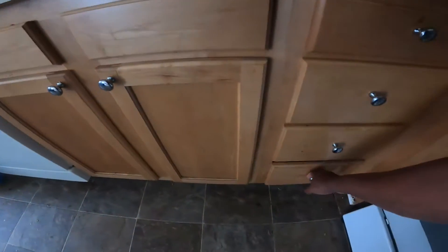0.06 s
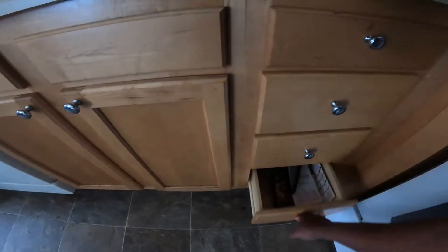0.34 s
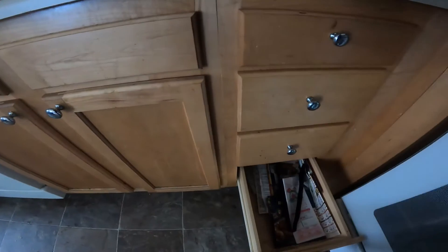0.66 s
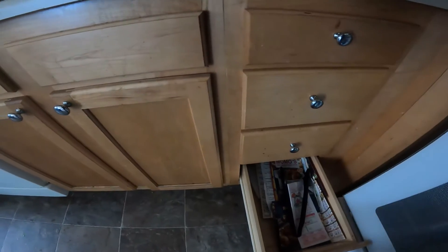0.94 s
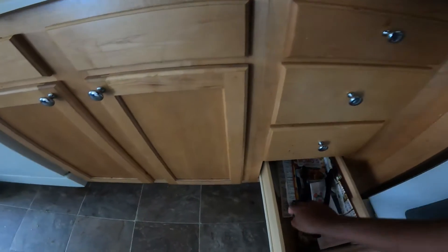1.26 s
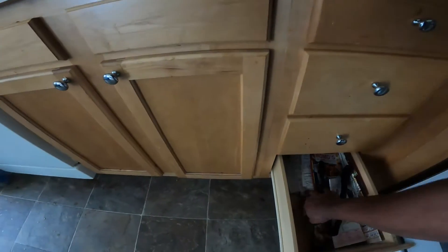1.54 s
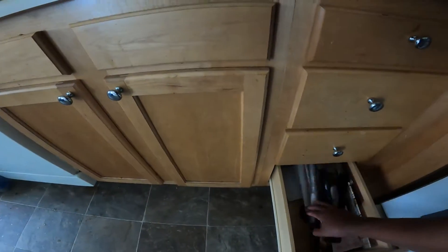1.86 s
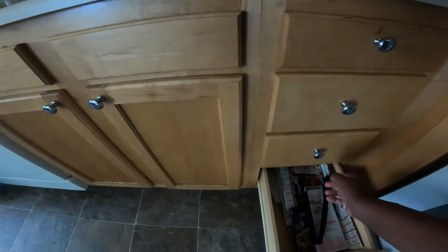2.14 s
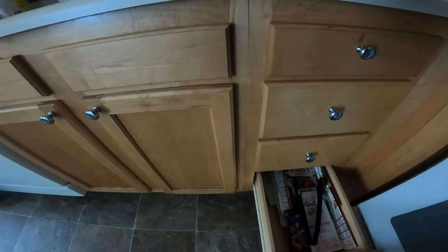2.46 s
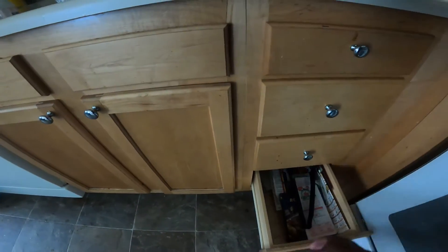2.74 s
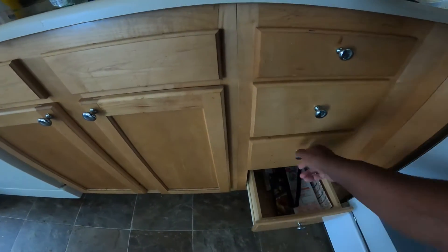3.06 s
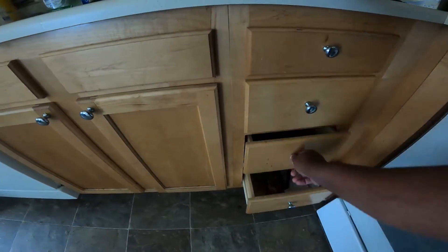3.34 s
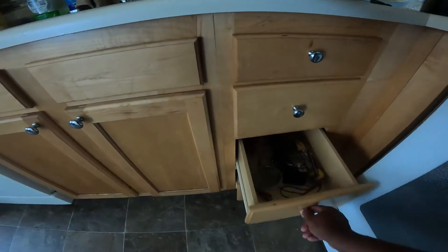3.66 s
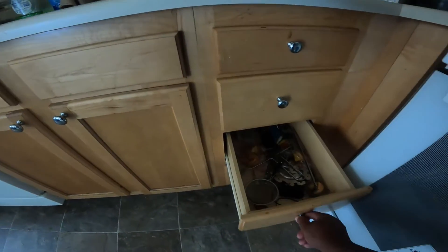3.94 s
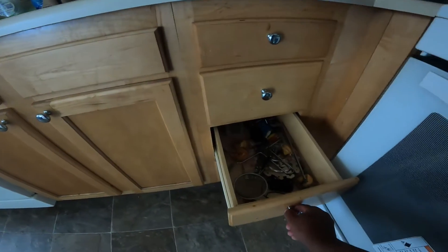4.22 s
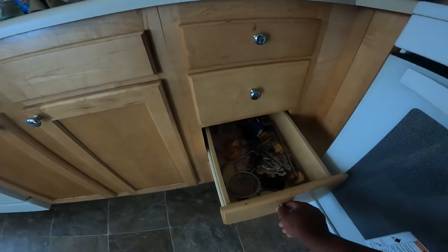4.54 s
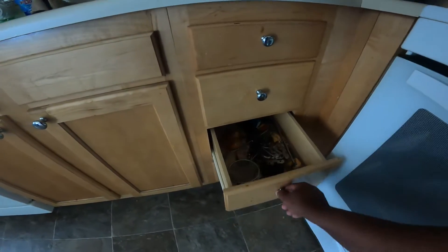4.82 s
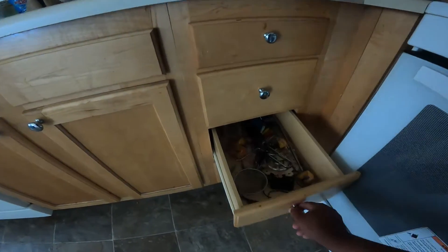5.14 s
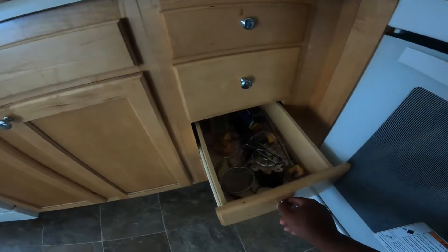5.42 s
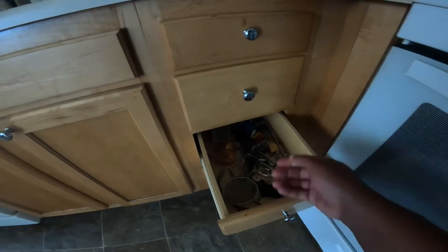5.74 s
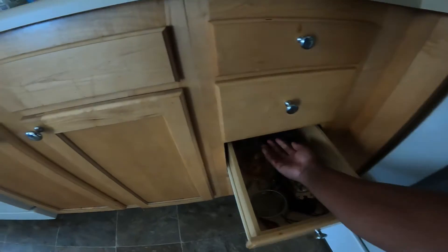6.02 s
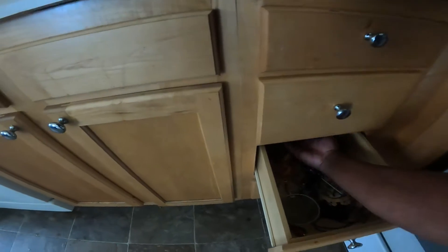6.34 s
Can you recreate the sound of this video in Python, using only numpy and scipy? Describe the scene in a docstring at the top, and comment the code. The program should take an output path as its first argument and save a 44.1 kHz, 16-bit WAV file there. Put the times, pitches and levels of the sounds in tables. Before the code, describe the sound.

Heard from just above in a small kitchen with a faint low hush, a wooden drawer scrapes open on droning rollers from about 0.3 to 1 second, with a sharp utensil clack midway. From 1.5 to 2.1 seconds a hand rummages inside: utensils shuffle, clack and ping, with a loud hollow double knock at 1.8. The drawer is pushed back in two quieter slides between 2.6 and 3.4 seconds, starting with a bump. Straight away a fuller drawer judders out, its contents clinking, and strikes its stop at 3.9 and 4.1 seconds with sharp cracks and a low cabinet thud. From about 4.7 to 5.4 seconds it is jiggled, wood rasping and knocking while the contents rattle brightly, with another hard hit at 5.2. A lighter clack follows at 5.6, then a very faint arm rustle and a small knock at 6.3 seconds.

```python
"""A wooden drawer scrapes open on droning rollers, heard from just above in a small kitchen.
A hand rummages among its utensils and pushes it back; the drawer above is pulled to its stop
and jiggled. Sliding friction of wood on wood makes the scrape. Impacts excite damped modes:
the boxes boom and ring, the cabinet thuds, runners tick, and the utensils clack and ping inside."""
import sys
import numpy as np
from scipy import signal
from scipy.fft import rfft, irfft
from scipy.io import wavfile

SR = 44100
rng = np.random.default_rng(int(sys.argv[2]) if len(sys.argv) > 2 else 0)


def transcribe(signal):
    """Save signal, clipped to [-1, 1], as a 16-bit WAV file at the path in sys.argv[1]."""
    frames = np.atleast_2d(signal).T
    limited = np.clip(frames, -1, 1)
    pcm = np.round(limited * 32767).astype(np.int16)
    wavfile.write(sys.argv[1], SR, pcm)


N = 281358
TIME = np.arange(N) / SR

# Panel resonances that colour rubs and cracks. Each row: centre in Hz, width in Hz, gain in dB.
PANELS = [(316, 42, 2.5), (452, 45, 2.5), (576, 65, 5.5), (670, 60, 3.5), (840.5, 13.4, 6), (1060, 340, -4),
          (1320, 97, 2), (2430, 23, -0.5)]
# Strokes of the bottom drawer. Each row: start, rise, hold and fall in seconds, level in dB
# relative to a firm stroke, brightness in dB.
BOTTOM_SLIDES = [(0.255, 0.29, 0.042, 0.41, 2.5, 8), (2.566, 0.22, 0.2, 0.151, -8, 10),
                 (3.024, 0.0507, 0.32, 0.063, -12.5, 3.5)]
# The upper drawer hits its stop, rebounds and shakes its contents. Each row: start in seconds,
# boom and crack in dB, rebound delay in seconds, shake level and shake brightness in dB.
STOPS = [(3.9119, -19.5, -16.5, 0.043, -8.5, 2.5), (4.094, -24, -20, .016, -4.5, 0.5),
         (5.244, -25.5, -16.5, .013, -3, -1.5)]


def from_db(db):
    return 10 ** (np.asarray(db) / 20)


def rms_one(x):
    return x / np.sqrt(np.mean(x ** 2) + 1e-20)


def unit_hit(x, size):
    """Normalisation of a hit to rms 1 over its first samples."""
    return x / np.sqrt(np.mean(x[:size] ** 2))


def at_hz(points, hz):
    """Interpolation on a logarithmic frequency axis."""
    frequencies, values = np.array(points).T
    return np.interp(np.log(hz + 1), np.log(frequencies), values)


def fade(t, t60):
    """Exponential decay, 60 dB down after t60 seconds."""
    return np.exp(-np.log(1000) * t / max(t60, 1e-3))


def band(x, hz, kind):
    return signal.sosfilt(signal.butter(3, hz, kind, fs=SR, output="sos"), x)


def add(out, s, sound):
    """Superposition: a sound joins the mix at s seconds."""
    start = round(s * SR)
    out[start:start + len(sound)] += sound[:N - start]


def envelope(s, rise, hold, fall):
    """Trapezoidal motion: a stroke gathers speed, holds it and slows to rest."""
    return np.interp(TIME, s + np.cumsum([0, rise, hold, fall]), [0, 1, 1, 0])


def coloured(x, spectrum, resonances=()):
    """Minimum-phase filtering: a broad spectrum with narrow resonances on top."""
    size = 4096
    hz = np.arange(size // 2 + 1) * SR / size
    peaks_db = sum(db / (1 + (2 * (hz - centre) / width) ** 2) for centre, width, db in resonances)
    cepstrum = irfft(np.log(from_db(at_hz(spectrum, hz) + peaks_db)))
    causal = np.r_[cepstrum[0], 2 * cepstrum[1:size // 2]]
    response = irfft(np.exp(rfft(causal, size)))
    return signal.fftconvolve(x, response)[:len(x)]


def friction(per_s, spread_db, grain_t60, smooth_db):
    """Stick-slip friction: tiny catches of uneven size, each a brief burst, over a smooth rub."""
    sizes = from_db(spread_db * np.minimum(rng.exponential(1, N), 3))
    catches = sizes * (rng.random(N) < per_s / SR)
    power = signal.lfilter([1], [1, -fade(1 / SR, grain_t60) ** 2], catches ** 2 + 1e-12)
    return np.sqrt(power / power.mean() + from_db(smooth_db) ** 2) * rng.standard_normal(N)


def movement(rub, spectrum, strokes, boom_db, rasp_db, rattle_db):
    """Forced vibration: with speed, friction shakes the box, rasps the panels, rattles the contents."""
    boom_follows = 0.71   # share of a stroke's swing in dB that the boom follows
    sound = coloured(rub, spectrum, PANELS)
    boom = rms_one(band(sound, 650, "low"))
    rasp = rms_one(band(sound, [650, 3500], "band"))
    rattle = rms_one(band(sound, 3500, "high"))
    out = np.zeros(N)
    for s, rise, hold, fall, db, bright_db in strokes:
        effort = from_db(db) * envelope(s, rise, hold, fall)
        out += from_db(boom_db - bright_db) * effort ** boom_follows * boom
        out += effort * (from_db(rasp_db) * rasp + from_db(rattle_db + bright_db) * rattle)
    return out


def drawers():
    """Sliding friction: the bottom drawer runs fairly smoothly; the fuller upper one judders."""
    # Rubbing spectra of each motion. Each row: frequency in Hz, relative level in dB.
    bottom_rub = [(40, -28), (113, -8.5), (251, 1), (443, -6), (728, -13), (866, -11.5), (1080, -11),
                  (1400, -13), (3930, -22.5), (6620, -33.5), (12000, -63), (15000, -71)]
    upper_rub = [(40, -20.5), (186, -10.5), (280, 5.5), (382, -9), (554, -11), (728, -20.5), (804, -16),
                 (1110, -20.5), (1780, -22.5), (3830, -32), (6950, -51.5), (15000, -84)]
    jiggle_rub = [(40, -40), (135, -15), (270, 7), (364, -1.5), (502, -10), (900, -7.5), (1450, -4.5),
                  (3070, -16.5), (3930, -25), (4450, -25.5), (7130, -38.5), (15000, -71)]
    shake_rub = [(30, -58), (110, -23), (185, -14), (285, -0.5), (370, -2), (520, -12.5), (750, -17.5),
                 (1500, -17), (4200, -25.5), (6880, -36.5), (15000, -74)]
    # Upper drawer strokes. Each row: start, rise, hold, fall in seconds, level and brightness in dB.
    upper_slides = [(3.39, 0.11, 0.6, 0.11, 0, 1.5), (3.63, 0.059, 0.017, 0.04, -8, -7)]
    jiggles = [(4.756, 0.045, 0.12, 0.069, -14, 0), (4.954, 0.08, 0.095, 0.17, 0.5, 0)]
    rise_s, hold_s, fall_s = 0.018, 0.05, 0.1
    shakes = [(s, rise_s, hold_s, fall_s, db, bright_db) for s, *_, db, bright_db in STOPS]
    jostle = from_db(-5.5) * clinks(per_s=220, spread_db=16, t60=0.035)
    smooth = friction(per_s=620, spread_db=6.5, grain_t60=0.068, smooth_db=6)
    rough = friction(per_s=520, spread_db=2, grain_t60=0.0033, smooth_db=2.5) + jostle
    return (movement(smooth, bottom_rub, BOTTOM_SLIDES, boom_db=-24, rasp_db=-30, rattle_db=-49.5)
            + movement(rough, upper_rub, upper_slides, boom_db=-24, rasp_db=-28.5, rattle_db=-39.5)
            + movement(rough, jiggle_rub, jiggles, boom_db=-22, rasp_db=-21.5, rattle_db=-25.5)
            + movement(rough, shake_rub, shakes, boom_db=-22, rasp_db=-17.5, rattle_db=-26))


def cavity(x, echo_db, t60):
    """Interference: echoes between the close drawer walls put a hollow ripple in the spectrum."""
    t = TIME[:SR // 20]
    echoes = rng.standard_normal(len(t)) * fade(t, t60)
    response = from_db(echo_db) * band(echoes / np.sqrt(np.sum(echoes ** 2)), 600, "high")
    response[0] += 1   # the direct path
    return signal.fftconvolve(x, response)[:len(x)] / np.sqrt(np.sum(response ** 2))


def shifting_cavity(x, echo_db, t60, turns_per_s):
    """Changing path lengths: as drawer and contents move, the echoes drift among six patterns."""
    phase = 2 * np.pi * turns_per_s * TIME
    weights = np.array([np.cos(phase * rng.uniform(0.5, 1) + 2 * np.pi * rng.random())
                        for _ in range(6)])
    echoes = sum(weight * (cavity(x, echo_db=0, t60=t60) - np.sqrt(0.5) * x) for weight in weights)
    echoes /= np.sqrt(0.5 * np.sum(weights ** 2, axis=0))
    share = from_db(echo_db)
    return (x + share * echoes) / np.sqrt(1 + share ** 2)


def rollers():
    """Rolling noise: the bottom drawer's rollers drone higher and louder the faster it runs."""
    crawl_hz, rise_hz, width_hz, level_db = 241, 191, 128, -28
    speeds = [(envelope(s, rise, hold, fall), db) for s, rise, hold, fall, db, _ in BOTTOM_SLIDES]
    hz = crawl_hz + rise_hz * np.max([speed for speed, _ in speeds], axis=0)
    phase = 2 * np.pi * np.cumsum(hz) / SR
    in_phase, quadrature = band(rng.standard_normal((2, N)), width_hz / 2, "low")
    drone = rms_one(in_phase * np.cos(phase) + quadrature * np.sin(phase))
    return drone * sum(from_db(level_db + db) * speed ** 2 for speed, db in speeds)


def ringing(modes, t, spread_db, detune):
    """Modal vibration: each blow excites every mode with a strength and pitch slightly its own."""
    return sum(from_db(db + spread_db * rng.normal()) * fade(t, t60)
               * np.sin(2 * np.pi * hz * (1 + detune * rng.normal()) * t) for hz, db, t60 in modes)


def clacks_and_rings():
    """Damped impacts: hard contacts chatter for an instant; utensils and box ring briefly."""
    # Sharp clacks and ticks: utensils colliding, runners ticking, the drawer striking its stop.
    # Each row: start in seconds, clack level and bright edge level in dB.
    clacks = [(0.537, -23.5, -31.5), (0.683, -32.5, -41), (1.216, -50, -55), (1.243, -70, -59),
              (1.491, -53, -55), (1.5192, -44, -46), (1.609, -30.5, -34), (1.6226, -35, -36),
              (1.9258, -24.5, -26), (1.9464, -23.5, -22.5), (2.007, -41, -29.5), (2.094, -30.5, -36),
              (2.104, -33, -45), (3.09, -40.5, -83), (3.2203, -43, -75), (3.311, -40, -59),
              (3.434, -31.5, -39), (3.462, -31, -52), (3.486, -34, -47), (3.522, -33, -47),
              (3.569, -32, -35.5), (3.705, -30, -28.5), (3.744, -32, -30.5), (3.837, -33, -41),
              (3.88, -35.5, -49), (3.912, -20.5, -32.5), (4.003, -28, -37), (4.094, -17, -33.5),
              (4.187, -49, -43), (4.896, -35, -23), (4.947, -48, -40), (5.049, -30, -24.5),
              (5.121, -25, -33), (5.2206, -29, -39), (5.244, -16.5, -31), (5.349, -25, -32),
              (5.443, -58, -49), (5.5611, -25, -42), (5.624, -38, -38)]
    # Spectrum of the contact. Each row: frequency in Hz, relative level in dB.
    clack_spectrum = [(300, 1), (1000, -3), (2000, 3.5), (3200, 2.5), (5000, -0.5), (7000, -8.5),
                      (9000, -23.5), (12000, -35), (15000, -54)]
    # Utensil modes. Each row: frequency in Hz, relative level in dB, t60 in seconds.
    modes = [(1414, -7.5, 0.062), (2007, 4, 0.075), (2550, 5, 0.035), (3104, 3, 0.03), (4294, -3.5, 0.059),
             (5360, -13, 0.02)]
    # Brief single-note rings: utensils ping, and the wooden box rings under a hard knock.
    # Each row: start in seconds, pitch in Hz, level in dB, t60 in seconds.
    rings = [(.537, 6040, -24, 0.024), (1.521, 4180, -34, 0.03), (1.801, 860, -17, 0.026),
             (1.819, 1314, -17, 0.048), (1.928, 2570, -12, 0.015), (2.097, 860, -20.5, 0.063),
             (3.836, 3930, -19.5, 0.04), (3.912, 1490, -9, 0.041), (3.932, 3540, -18, 0.037),
             (4.028, 5750, -29, 0.027), (4.048, 5040, -31, .035), (4.096, 1786, -10, .05),
             (4.187, 4850, -23, 0.04), (5.05, 4350, -13, 0.027), (5.738, 1157, -29.5, 0.038)]
    chatter_s, edge_hz = 0.0045, 4000
    out, t = np.zeros(N), TIME[:SR // 4]
    press = (1 - fade(t, t60=0.0014)) ** 2   # contact builds over a millisecond or so
    chatter = press * fade(np.maximum(t - chatter_s, 0), t60=0.035)
    for s, clack_db, edge_db in clacks:
        ring = unit_hit(press * ringing(modes, t, spread_db=4, detune=0.08), size=440)
        burst = coloured(chatter * rng.standard_normal(len(t)), clack_spectrum)
        tick = unit_hit(cavity(burst, echo_db=0, t60=0.0054), size=440)
        clack = tick + from_db(-5.5) * ring
        dull = unit_hit(band(clack, edge_hz, "low"), size=440)
        edge = unit_hit(band(clack, edge_hz, "high"), size=440)
        add(out, s, from_db(clack_db) * dull + from_db(edge_db) * edge)
    for s, hz, db, t60 in rings:
        add(out, s, from_db(db) * press * fade(t, t60) * np.sin(2 * np.pi * hz * t))
    return out


def hand():
    """Friction noise: the reaching arm rustles faintly; fingers shove utensils over each other."""
    # Arm and finger strokes. Each row: start, rise, hold, fall in seconds, level and brightness in dB.
    reaches = [(1.1, 0.01, 0.095, 0.5, 0.0041, -1.9), (5.6, 0.15, 0.75, .1, 0.031, 0.05)]
    shoves = [(1.48, 0.033, 0.12, 0.015, -15, 0), (1.611, 0.026, 0.039, 0.026, 0.5, 7),
              (1.671, 0.046, 0.047, 0.057, -0.5, 1), (1.86, 0.042, 0.022, 0.035, -11, 4.5),
              (1.985, 0.026, 0.036, 0.077, 5, -0.5)]
    # Spectrum of the shuffling. Each row: frequency in Hz, relative level in dB.
    shuffle = [(40, -27), (164, -13), (298, 2), (392, 0.5), (659, -10.5), (980, -2.5), (2520, -17.5),
               (4790, -32.5), (7490, -41.5), (15000, -72)]
    shoving = friction(per_s=1100, spread_db=4, grain_t60=0.016, smooth_db=-5)
    shoving += from_db(-8) * clinks(per_s=560, spread_db=11, t60=0.028)
    brushing = rng.standard_normal(N)
    return (movement(brushing, shuffle, reaches, boom_db=-47, rasp_db=-50, rattle_db=-56.5)
            + movement(shoving, shuffle, shoves, boom_db=-32, rasp_db=-31.5, rattle_db=-33))


def cabinet():
    """Resonance of a large mass: the heavy frame swings up slowly and rings low."""
    # A drawer tugs at the frame or takes a weight. Each row: start in seconds, level in dB.
    thuds = [(1.197, -32), (1.804, -27), (3.504, -24.5), (4.101, -14.5), (5.247, -28)]
    # Frame modes. Each row: frequency in Hz, relative level in dB, t60 in seconds.
    modes = [(110.6, -6, 0.19), (140, -5, 0.21), (185.8, -3.5, 0.23)]
    out, t = np.zeros(N), TIME[:SR // 2]
    swell = (1 - fade(t, t60=0.044)) ** 2
    for s, db in thuds:
        add(out, s, from_db(db) * swell * ringing(modes, t, spread_db=-5, detune=0.02))
    return out


def blows():
    """Collisions of wood on wood: knocks, hits on the stop and their duller rebounds."""
    # Knocks on the boxes. Each row: start in seconds, boom and crack in dB, pitch ratio of the box.
    box_knocks = [(1.199, -37.5, -54, 0.65), (1.683, -32, -38, 0.95), (1.702, -27, -32.5, 1.14),
                  (1.8006, -9.5, -23, 1.0), (1.8175, -12, -25, 1.0), (1.861, -24, -36.5, 0.95),
                  (2.046, -21, -30, 1.11), (2.602, -16, -42, 0.97), (3.922, -17.5, -38, 1.07),
                  (3.961, -13.5, -32, 0.88), (4.0, -15.5, -33, 1.11), (4.148, -21, -24, 0.76),
                  (4.694, -34.5, -44, 1.18), (4.719, -38, -35, 1.05), (4.729, -35, -37, 0.96),
                  (4.81, -27.5, -47, 1.16), (4.897, -31, -32.5, 0.86), (5.088, -19.5, -44, 1.1),
                  (5.149, -36, -23, 1), (5.19, -19, -40, 0.97), (5.305, -18.5, -38, 1.25),
                  (5.54, -40, -35.5, 1.04), (5.563, -29, -38.5, 1.1), (5.737, -37.5, -38, 0.99),
                  (6.316, -34, -35.5, 1.01), (6.331, -24.5, -36.5, 0.97)]
    pitch = 0.92   # the deeper upper box rings lower
    hits = [(s, boom_db, crack_db, pitch) for s, boom_db, crack_db, *_ in STOPS]
    rebounds = [(s + delay, boom_db + 6.5, crack_db - 6, pitch)
                for s, boom_db, crack_db, delay, *_ in STOPS]
    return list(box_knocks) + hits + rebounds


def knocks():
    """Impact excitation: the box booms under a short crack; so small a box radiates little bass."""
    # Drawer box modes. Each row: frequency in Hz, relative level in dB, t60 in seconds.
    box_modes = [(229.8, -10, 0.11), (275, 5.5, 0.071), (324, -6.5, 0.16), (394.7, -15.5, 0.21),
                 (463.7, -15, 0.18), (559, -18, 0.19), (858, -11, 0.083), (1350, -18, 0.087)]
    # Spectrum of the crack. Each row: frequency in Hz, relative level in dB.
    crack_spectrum = [(200, -16), (500, -5.5), (900, -10), (1700, -6), (3800, -14), (5500, -25),
                      (7500, -37.5), (9500, -64), (15000, -68)]
    out, t = np.zeros(N), TIME[:SR // 3]
    swell = 1 - fade(t, t60=0.023)   # the panels take a cycle or so to get going
    contact = fade(t, t60=0.07) + from_db(-18) * fade(t, t60=0.25)   # crack, then reflections inside
    for s, boom_db, crack_db, pitch in blows():
        # a softer blow has less crack and reaches only the lowest modes
        reach_hz = np.clip(1500 * from_db(0.42 * (crack_db - boom_db)), 300, 2500)
        radiation = signal.butter(2, [190, reach_hz], "band", fs=SR, output="sos")
        modes = [(hz * pitch, db, t60) for hz, db, t60 in box_modes]
        vibration = swell * ringing(modes, t, spread_db=5.5, detune=0.018)
        boom = unit_hit(signal.sosfilt(radiation, vibration), size=880)
        burst = coloured(contact * rng.standard_normal(len(t)), crack_spectrum, PANELS)
        crack = unit_hit(cavity(burst, echo_db=-0.5, t60=0.011), size=880)
        add(out, s, from_db(boom_db) * boom + from_db(crack_db) * crack)
    return out


def clinks(per_s, spread_db, t60, count=40):
    """Bending of free bars: loose pieces jostle at random, each with three inharmonic partials."""
    touches = (rng.random(N) < per_s / SR) * from_db(-spread_db * rng.random(N))
    piece = rng.integers(0, count, N)
    out, t = np.zeros(N), TIME[:SR // 8]
    for k, hz in enumerate(np.geomspace(900, 2900, count)):
        tone = sum(np.sin(2 * np.pi * hz * ratio * t) for ratio in (1, 2.76, 5.4)) * fade(t, t60)
        for i in np.flatnonzero(touches * (piece == k)):
            add(out, i / SR, touches[i] * tone)
    return rms_one(out)


def tinkle():
    """Random impacts: in a hard-shaken heap, tines and wires give a dense spray of bright ticks."""
    # Spells of chatter. Each row: start, rise, hold and fall in seconds, level in dB.
    spells = [(1.622, 0.026, 0.036, .035, -34), (3.45, 0.32, .18, .05, -45.5),
              (3.925, 0.071, 0.053, 0.062, -32), (4.952, 0.11, 0.11, 0.046, -35),
              (5.249, 0.023, 0.053, 0.035, -30)]
    # Spectrum of the ticks. Each row: frequency in Hz, relative level in dB.
    spectrum = [(100, -49), (500, -17), (1500, 3), (4000, -1), (7000, -11), (9000, -24), (12000, -30),
                (15000, -43)]
    chatter = friction(per_s=900, spread_db=6, grain_t60=0.004, smooth_db=-9)
    ticks = rms_one(coloured(chatter, spectrum))
    return ticks * sum(from_db(db) * envelope(*timing) for *timing, db in spells)


def kitchen(x, build_s):
    """Reverberation: diffuse reflections from cabinets and floor build up, then die octave by octave."""
    # Reverberation times. Each row: frequency in Hz, t60 in seconds.
    decay_times = [(150, 0.58), (3000, 0.53), (14000, 0.44)]
    t, edges = TIME[:SR * 2 // 3], np.geomspace(60, 15360, 9)
    tail = np.zeros(len(t))
    for low, high in zip(edges, edges[1:]):
        octave = band(rng.standard_normal(len(t)), [low, high], "band")
        tail += octave * fade(t, at_hz(decay_times, np.sqrt(low * high)))
    tail *= 1 - np.exp(-t / build_s)
    return signal.fftconvolve(x, tail / np.sqrt(np.sum(tail ** 2)))[:N]


def hush():
    """Stationary noise: a faint, low hush fills the room."""
    # Spectrum of the hush. Each row: frequency in Hz, relative level in dB.
    spectrum = [(30, -27), (95, -24.5), (165, 2), (250, -7), (330, -2), (700, -12), (1000, -15),
                (1600, -24), (5500, -28), (9000, -51), (15000, -78)]
    return from_db(-46.3) * rms_one(coloured(rng.standard_normal(N), spectrum))


def scene():
    """Superposition: all sources lie straight ahead, so both channels hear the same."""
    rubbing = shifting_cavity(drawers() + hand(), echo_db=-7, t60=0.018, turns_per_s=4)
    direct = rubbing + rollers() + knocks() + cabinet() + clacks_and_rings() + tinkle()
    sound = direct + hush() + from_db(-14) * kitchen(direct, build_s=0.029)
    return np.array([sound, sound])


def record(dry):
    """Band limiting: the microphone loses the deepest bass, a narrow treble band and the very top."""
    bass_hz, dip_hz, cutoff_hz = 38, 9020, 15100
    dipped = signal.lfilter(*signal.iirnotch(dip_hz, Q=18, fs=SR), band(dry, bass_hz, "high"))
    return signal.sosfilt(signal.ellip(10, 0.2, 80, cutoff_hz, fs=SR, output="sos"), dipped)


dry = scene()
out = record(dry)
transcribe(out)
```